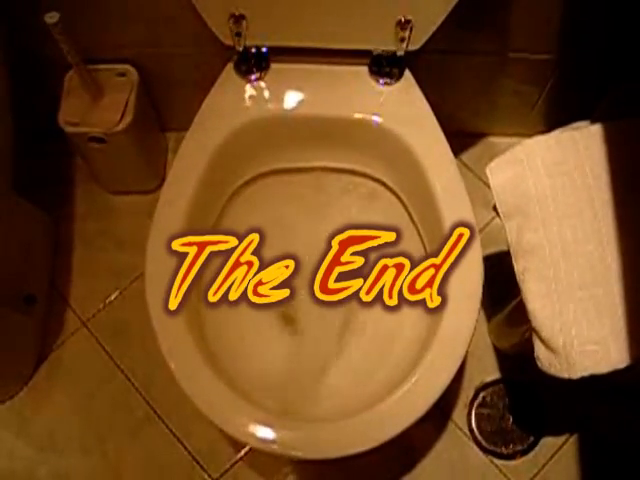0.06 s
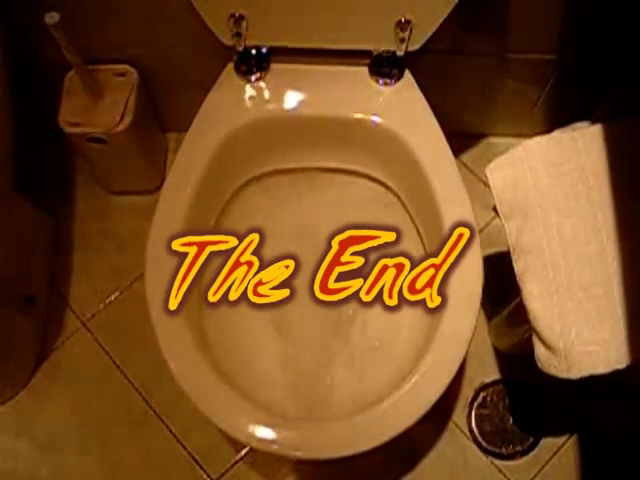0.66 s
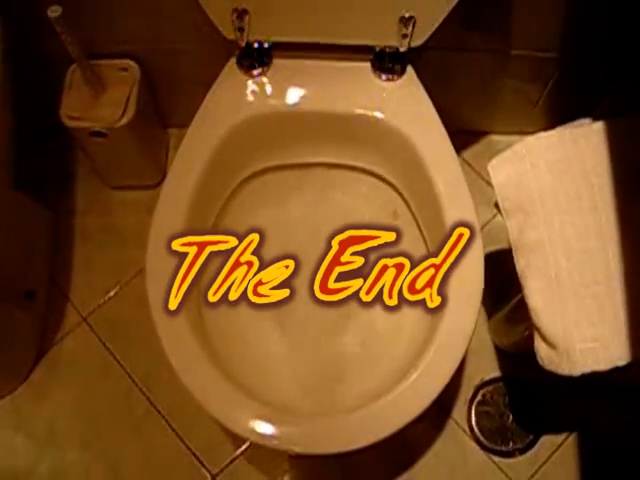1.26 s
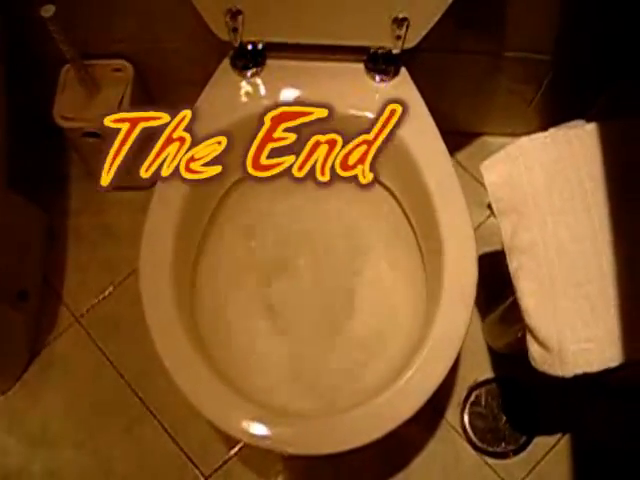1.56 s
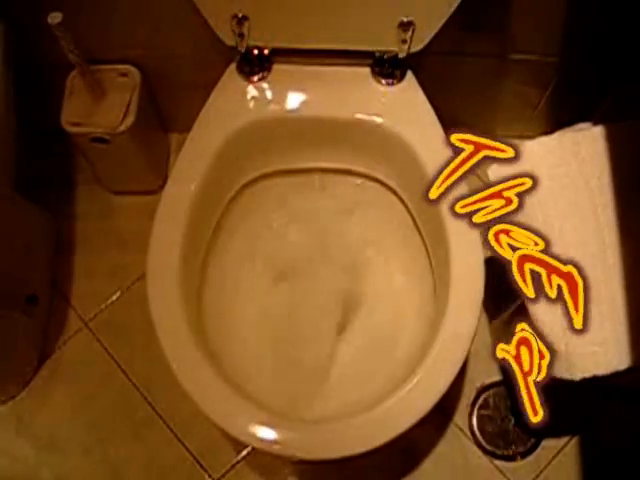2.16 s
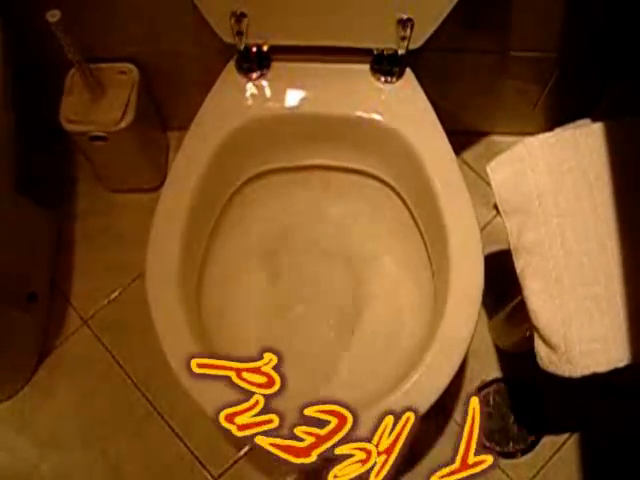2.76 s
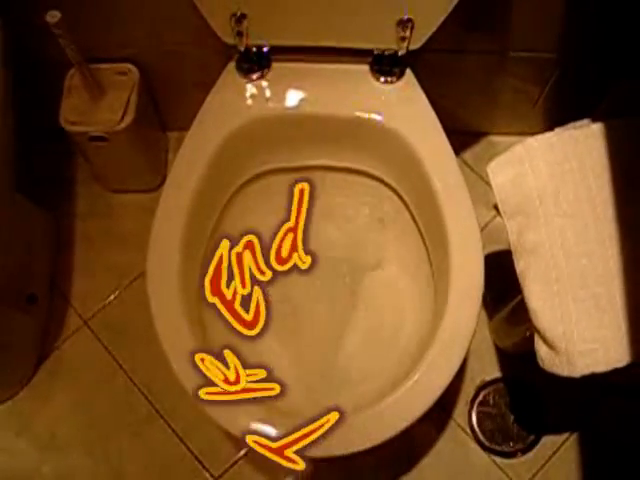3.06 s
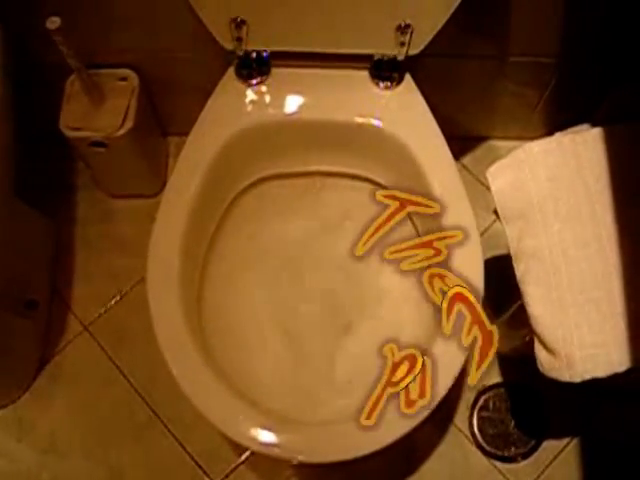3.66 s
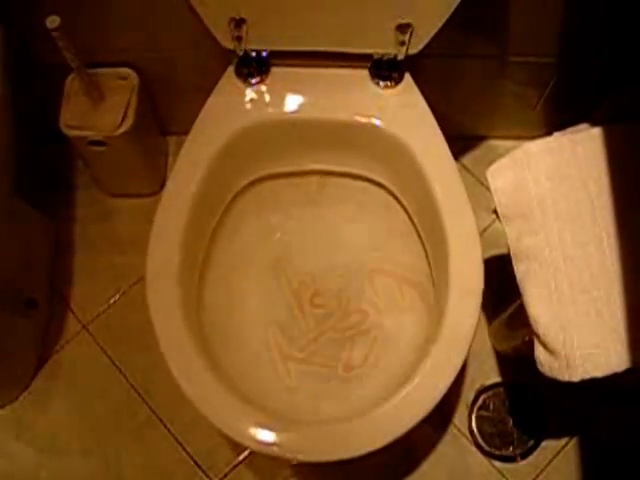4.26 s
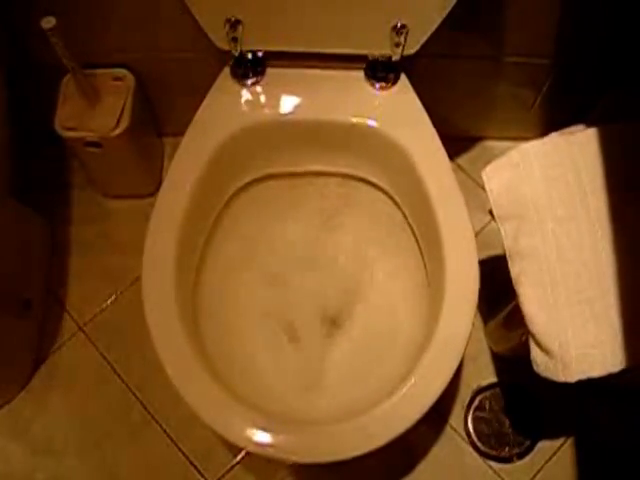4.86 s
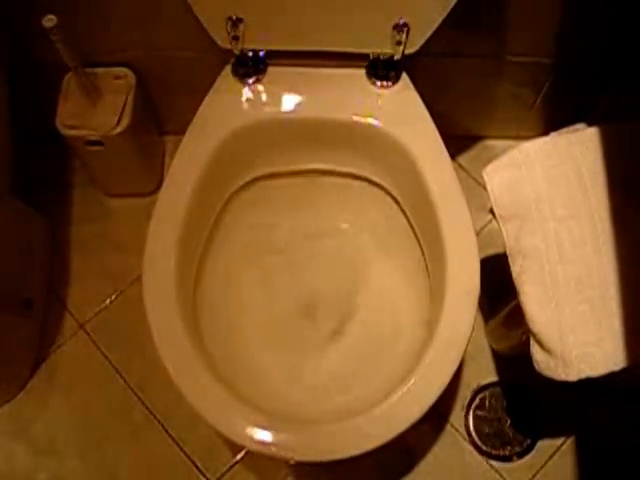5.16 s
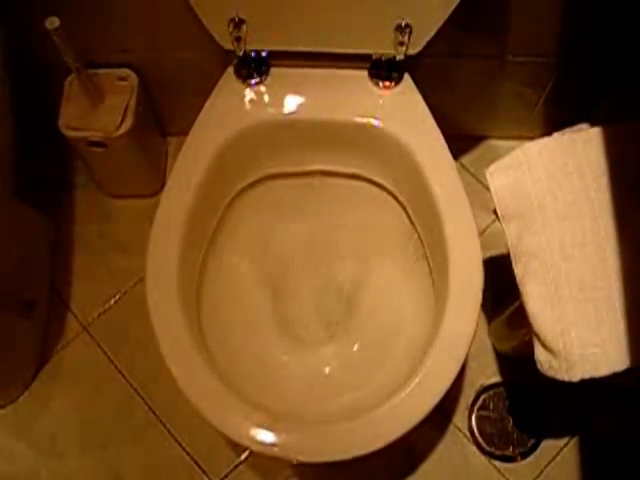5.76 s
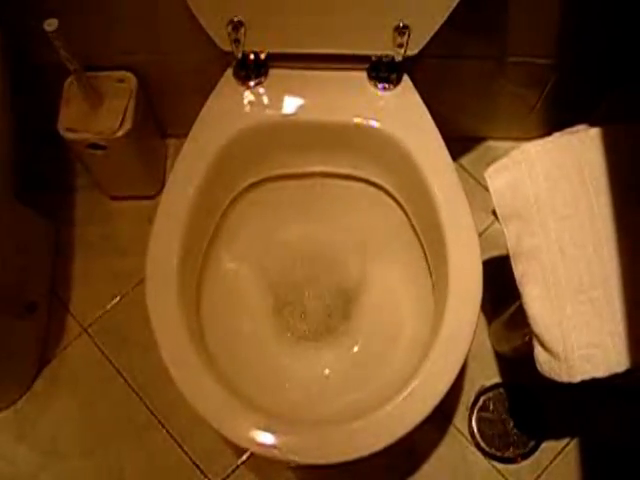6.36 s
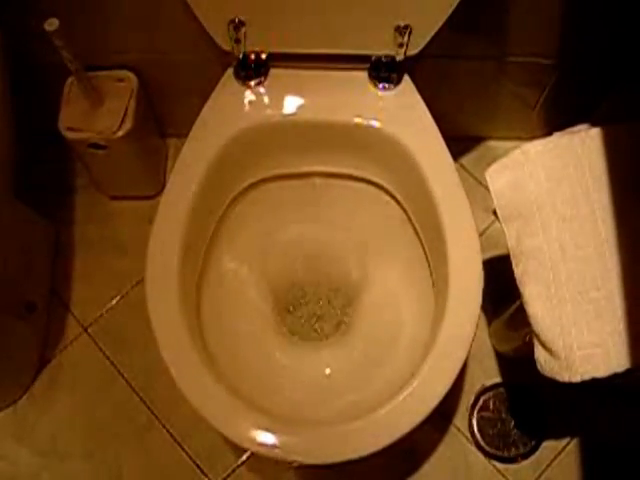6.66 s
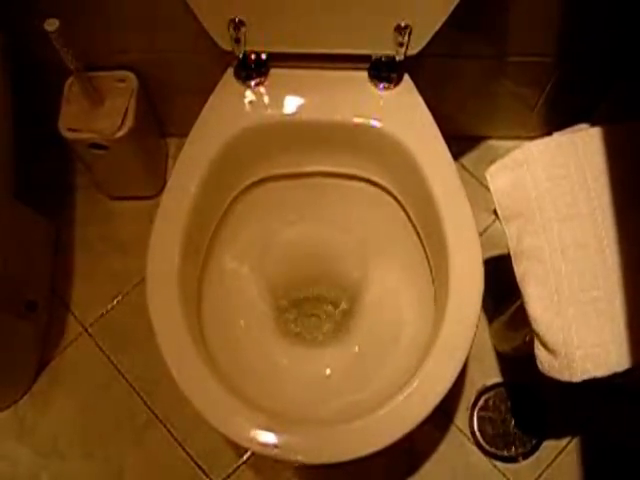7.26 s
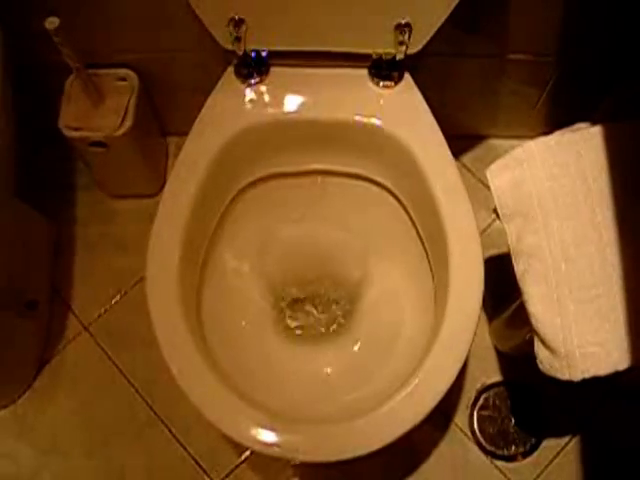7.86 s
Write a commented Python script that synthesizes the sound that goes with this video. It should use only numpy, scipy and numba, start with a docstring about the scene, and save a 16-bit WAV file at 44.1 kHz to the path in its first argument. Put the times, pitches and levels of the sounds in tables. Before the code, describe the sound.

A toilet flushes with a deep gush, churning and swirling down, then splashing and gurgling at the drain in a small tiled bathroom.

```python
"""Water plunges into a toilet bowl with a deep gush, heard from just above in a small tiled bathroom.
The flush churns in surges, calms as it swirls down, then splashes and gurgles in the emptying drain.
Air bubbles caught in the water ring like tiny bells: big ones low, small ones high.
Swarms of them mix with the spatter of drops. The hollow bowl colours the sound and the tiles echo it."""
import sys
import numpy as np
from scipy import signal
from scipy.fft import irfft
from scipy.io import wavfile
from numba import njit

SR = 44100
rng = np.random.default_rng(int(sys.argv[2]) if len(sys.argv) > 2 else 0)


def output_pcm(signal):
    """Save a mono or channel-first signal as 16-bit PCM at the path in sys.argv[1].

    Samples are clipped to [-1, 1] before scaling.
    """
    pcm = np.clip(np.atleast_2d(signal).T, -1, 1) * 32767
    wavfile.write(sys.argv[1], SR, np.round(pcm).astype(np.int16))


N = 353241
TIME = np.arange(N) / SR
SURGE_RISE_S, SURGE_FADE_S = .015, .021  # a fade time is how long a sound takes to fall to 37%
# waves that fold over in the bowl and churn air under: (start [s], length [s], churn level [dB])
WAVES = [(1.455, 0.068, -26.5), (1.765, 0.12, -30), (1.913, 0.025, -25.5), (1.99, 0.069, -29.5),
         (2.486, 0.076, -27.5), (2.662, 0.092, -24.5), (2.882, 0.052, -32), (3.026, 0.066, -27.5),
         (3.155, 0.041, -27.5), (3.293, 0.082, -28.5), (3.371, 0.076, -29), (3.533, 0.17, -27),
         (3.885, 0.075, -29), (5.841, 0.04, -27), (5.99, 0.039, -31), (6.119, 0.034, -27),
         (6.325, 0.12, -30), (6.566, 0.031, -33), (7.094, 0.038, -22.5), (7.447, 0.017, -25),
         (7.748, 0.049, -27)]


def amp(db):
    """Turns decibels into a number to multiply a sound by."""
    return 10 ** (np.asarray(db) / 20)


def evened(x):
    """Scales a signal so that its average strength (rms) is 1."""
    return x / np.sqrt(np.mean(x ** 2) + 1e-20)


def at_pitch(points, hz):
    """Looks up a value between the rows of a (pitch, value) table."""
    pitches, values = np.transpose(points)
    return np.interp(np.log(hz + 1), np.log(pitches), values)


def curves(rows):
    """Joins the rows of a (time, values...) table into one curve for each value column."""
    times, *columns = np.transpose(rows)
    return [np.interp(TIME, times, column) for column in columns]


def add(mix, start_s, sound):
    """Mixes a sound in at the given time."""
    part = mix[max(round(start_s * SR), 0):][:len(sound)]
    part += sound[:len(part)]


def band_noise(lo_hz, hi_hz):
    """Noise between two frequencies; at just a few Hz it is a slow, random wobble."""
    band = signal.butter(2, [lo_hz, hi_hz], "band", fs=SR, output="sos")
    return evened(signal.sosfilt(band, rng.standard_normal(N)))


def colour(x, db_at, size=8192):
    """Turns each frequency up or down by db_at(hz); any ringing follows the sound, never leads it."""
    hz = abs(np.fft.fftfreq(size, 1 / SR))
    log_gain = np.log(amp(np.maximum(db_at(hz), -90)))
    taps = np.fft.ifft(np.exp(np.conj(signal.hilbert(log_gain)))).real
    return signal.oaconvolve(x, taps[:size // 2])[:N]


def bowl(x):
    """The air in the hollow bowl rings on at its own pitches."""
    # pitches the bowl lifts or weakens: (pitch [Hz], width [Hz], boost [dB])
    resonances = [(296, 26, 12.5), (392.7, 33, 10), (505, 76, 9.5), (587, 70, 8.5), (750, 4, 12),
                  (1031, 110, -8), (1232, 69, 8.5), (1624, 25, 7), (1992, 17, 8), (3482, 46, 7)]
    return colour(x, lambda hz: sum(db / (1 + (2 * (hz - f) / width) ** 2) for f, width, db in resonances))


@njit
def ring(starts, hz, peaks, fades_s, glides, onset):
    """Each bubble is a dying tone whose pitch slides as it nears the surface."""
    out = np.zeros(N)
    for k in range(len(starts)):
        life = fades_s[k] * SR  # in samples; onset is a share of it
        step = 2 * np.pi * hz[k] / SR
        turn = np.exp(1j * step - 1 / life)  # spins and shrinks the tone
        bend = np.exp(1j * step * glides[k] / life)  # slides its pitch
        opening = np.exp(-1 / (onset * life))  # softens its start
        tone, closed = peaks[k] + 0j, 1.
        for i in range(starts[k], min(starts[k] + int(5 * life), N)):
            out[i] += tone.imag * (1 - closed)
            tone *= turn
            turn *= bend
            closed *= opening
    return out


def surge_power(starts_s, lengths_s, levels_db, swell_db=0):
    """Total power of surges that each rise, hold (growing by swell_db) and die away."""
    power = np.zeros(N)
    for start, length, db in zip(starts_s, lengths_s, levels_db):
        t = TIME[:int((length + .2) * SR)]
        shape = np.minimum(t / SURGE_RISE_S, 1) * np.exp(-np.maximum(t - length, 0) / SURGE_FADE_S)
        growth_db = swell_db * (np.minimum(t / length, 1) - .5)
        add(power, start, (amp(db + growth_db) * shape) ** 2)
    return power


def water_levels():
    """Levels in dB of plunge, gurgle, churn and spray: steady flow plus gushes, waves and air pockets."""
    # the steady run of water: (time [s], plunge [dB], gurgle [dB], churn [dB], spray [dB])
    flow = [(0.0, -21.5, -36.5, -35.5, -30.5), (0.45, -46.5, -49, -30, -32),
            (0.85, -54.5, -46.5, -36.5, -33.5), (1.65, -54.5, -45.5, -32, -36), (2.3, -56, -46.5, -37, -38),
            (2.8, -49.5, -44, -34.5, -35.5), (3.4, -43.5, -44, -33.5, -41), (4.05, -39, -45, -34.5, -40.5),
            (4.28, -51, -45.5, -44, -39.5), (4.7, -50.5, -49.5, -42.5, -42.5), (5.55, -50.5, -45, -39, -40),
            (5.82, -48, -39.5, -39, -36), (6.0, -45, -43.5, -36, -42), (6.32, -37.5, -27.5, -28, -29.5),
            (6.95, -40, -30, -28, -29), (7.35, -30, -29.5, -27, -28), (8.0, -49, -28, -28.5, -31.5)]
    # gushes that dive deep and throw up spray: (start [s], length [s], plunge [dB], spray [dB])
    gushes = [(0.0, 0.085, -30, -28.5), (0.249, 0.089, -25, -28.5), (0.332, 0.034, -23, -23.5),
              (1.063, 0.078, -35.5, -32.5), (1.475, 0.028, -37, -31), (1.765, 0.17, -36, -32.5),
              (2.098, 0.055, -33.5, -35.5), (3.362, 0.091, -36, -46.5), (4.442, 0.06, -43, -34.5),
              (6.242, 0.1, -42, -31), (7.158, 0.043, -25, -29), (7.358, 0.026, -29.5, -33.5),
              (7.442, 0.016, -30.5, -24), (7.547, 0.084, -27, -46.5), (7.82, 0.063, -28.5, -25),
              (7.906, 0.11, -29, -30.5)]
    # moments when the steady run lets up: (middle [s], length [s], dip [dB])
    lulls = [(1.97, 0.032, -3.5), (3.513, 0.036, -2.5), (6.225, 0.036, -4.5), (6.664, 0.041, -9.5),
             (7.325, 0.049, -6.5), (7.489, 0.04, -6), (7.662, 0.027, -4)]
    # large air pockets that glug at the drain: (start [s], length [s], gurgle [dB])
    air_pockets = [(4.401, 0.029, -41.5), (4.834, 0.072, -40), (5.276, 0.079, -37.5), (5.919, 0.053, -35.5),
                   (6.089, 0.025, -27.5), (6.772, 0.092, -29.5), (7, 0.2, -26.5), (7.699, 0.13, -28.5)]
    lull_db = sum(db * np.exp(-(2 * (TIME - middle) / length) ** 2) for middle, length, db in lulls)
    plunge, gurgle, churn, spray = amp(np.array(curves(flow)) + lull_db) ** 2
    starts_s, lengths_s, deep_db, thrown_db = np.transpose(gushes)
    deep = surge_power(starts_s, lengths_s, deep_db)
    thrown = surge_power(starts_s, lengths_s, thrown_db)
    waves = surge_power(*np.transpose(WAVES), swell_db=5.5)
    glugs = surge_power(*np.transpose(air_pockets))
    # waves and gushes also stir the other bubble sizes, more weakly
    return 10 * np.log10([
        plunge + deep + amp(-14.5) ** 2 * waves,
        gurgle + glugs + amp(-17.5) ** 2 * waves + amp(-4.5) ** 2 * deep,
        churn + waves + amp(-1.5) ** 2 * thrown,
        spray + thrown + amp(-14) ** 2 * waves])


def swarm(sizes, level_db, max_per_s, cycles, spread_db, glide, spatter_db, slosh_db, tilt_db,
          thinning=.45, count=24000):
    """Many bubbles and a spatter of tiny impacts ring in the bowl; calm water makes fewer of both."""
    when, pitch, strength, damping, slide, chance = rng.random((count, 6)).T
    busy = amp(thinning * (level_db - level_db.max()))
    starts = (when * N).astype(np.int64)
    born = chance < max_per_s * busy[starts] * TIME[-1] / count
    lo, hi = sizes[0][0], sizes[-1][0]
    hz = lo * (hi / lo) ** pitch
    fades_s = cycles / hz * 2 ** (2 * damping - 1)
    # most bubbles are faint, a few strong; small ones die sooner and start louder
    peaks = amp(at_pitch(sizes, hz) + spread_db * np.minimum(-np.log(1 - strength), 4)) * hz / hi
    # a tilt (dB per octave) above zero favours high bubbles, below zero low ones
    peaks *= amp(tilt_db[starts] * np.log2(hz / np.sqrt(lo * hi)))
    glides = glide * (slide - .3)
    bubbles = ring(starts[born], hz[born], peaks[born], fades_s[born], glides[born], onset=.14)
    impacts = rng.standard_normal(N) * amp(3.07 * np.minimum(rng.exponential(1, N), 5))
    impacts *= rng.random(N) < 5000 * busy / SR
    # the spatter falls away by 40 dB per octave outside the bubbles' range
    spatter = colour(
        impacts, lambda f: at_pitch(sizes, f) - 40 * abs(np.log2((f + 1) / np.clip(f + 1, lo, hi))))
    water = bowl((evened(bubbles) + amp(spatter_db) * evened(spatter)) * amp(slosh_db))
    # flatten the slow swings in loudness, so that level_db shapes them
    power = signal.oaconvolve(water ** 2, signal.windows.hann(SR // 11), "same")
    return amp(level_db) * evened(water / np.sqrt(abs(power) + 1e-12))


def rush(plunge_db, gurgle_db, churn_db, spray_db):
    """Four swarms of bubbles, from deep plunge to fine spray, all shaken by the same sloshing."""
    # how strong each swarm's bubbles are, from big to small: (pitch [Hz], level [dB])
    plunge_sizes = [(60, -30), (105, -9.5), (175, -16), (240, -1.5), (310, 7), (450, -2.5), (620, -8)]
    gurgle_sizes = [(430, -13), (570, -6.5), (800, 0.5), (1050, 9), (1250, -13)]
    churn_sizes = [(1080, -11.5), (1220, 2.5), (1750, 4.5), (2250, 1), (2900, -7.5)]
    spray_sizes = [(2100, -5), (2750, 0), (4500, -1), (6000, -2.5), (8000, -10.5)]
    # the plunge booms deepest while the bowl is full: (time [s], tilt [dB per octave])
    plunge_tilts = [(0.3, -6.5), (2.0, -3), (4.5, -1.7), (7.0, -2)]
    # bubbles ring deep in the full bowl and higher as it empties: (time [s], tilt [dB per octave])
    gurgle_tilts = [(0, -5.5), (.7, -4), (4.9, -9.5), (6.2, 16.5)]
    plunge_tilt, = curves(plunge_tilts)
    gurgle_tilt, = curves(gurgle_tilts)
    churn_tilt = .47 * gurgle_tilt + wave_tilt()
    spray_tilt = -.42 * (spray_db - spray_db.mean())  # a hard splash throws larger, lower drops
    slosh, lapping_db = band_noise(9.9, 34), 1.03 * band_noise(6, 14)
    plunge = swarm(plunge_sizes, plunge_db - .6, max_per_s=920, cycles=3.74, spread_db=3.5,
                   glide=.0073, spatter_db=-3, slosh_db=2.1 * slosh, tilt_db=plunge_tilt)
    gurgle = swarm(gurgle_sizes, gurgle_db + lapping_db - .32, max_per_s=380, cycles=9.7, spread_db=.5,
                   glide=.071, spatter_db=-10, slosh_db=.59 * slosh, tilt_db=gurgle_tilt)
    churn = swarm(churn_sizes, churn_db + lapping_db - 1.78, max_per_s=2400, cycles=18, spread_db=4.5,
                  glide=.05, spatter_db=-8, slosh_db=1.6 * slosh, tilt_db=churn_tilt, thinning=.85)
    spray = swarm(spray_sizes, spray_db + lapping_db - 1.5, max_per_s=1900, cycles=14, spread_db=4.5,
                  glide=.027, spatter_db=-2, slosh_db=slosh, tilt_db=spray_tilt)
    return plunge + gurgle + churn + spray


def puffs(rows, hz=365, width_s=.0019, bowl_share=.44):
    """Short pushes of air, given as (time [s], level [dB]); part of each sets the bowl ringing."""
    out, t = np.zeros(N), TIME[:SR // 100] - 2 * width_s
    for middle, db in rows:
        add(out, middle + t[0], amp(db) * np.cos(2 * np.pi * hz * t) * np.exp(-(t / width_s) ** 2))
    return (1 - bowl_share) * out + bowl_share * bowl(out)


def flutter(ends_db=-5, jitter_s=.0002):
    """Trapped air escapes in quick runs of low puffs, strongest in the middle."""
    # runs of puffs: (start [s], length [s], puff rate [Hz], level [dB])
    runs = [(0.058, 0.034, 86, -21), (0.267, 0.044, 95.4, -17), (1.776, 0.145, 79.9, -28),
            (2.0716, 0.04, 97, -17)]
    rows = []
    for start, length, rate_hz, db in runs:
        for t in np.arange(0, length, 1 / rate_hz):
            when = start + t + jitter_s * rng.standard_normal()
            rows.append((when, db + ends_db * (2 * t / length - 1) ** 2))
    return puffs(rows)


def bubble_cluster(hz, width, size):
    """Tiny bubbles ringing together: noise with pitches spread around hz by the factor width."""
    f = np.fft.rfftfreq(size, 1 / SR) + 1
    strength = np.exp(-.5 * (np.log(f / hz) / np.log(width)) ** 2)
    phases = np.exp(2j * np.pi * rng.random(len(f)))
    return evened(irfft(strength * phases, size))


def slaps(rise_s=.0004, fade_s=.0063, width=1.73, gain_db=-1):
    """A sheet of water lands: a short wet splash, and a thud as it pushes the air in the bowl."""
    # water hitting water or porcelain: (time [s], splash level [dB], pitch [Hz], thud level [dB])
    landings = [(0.137,-20.5,1490,-12.5), (0.228,-28,2500,-16.5), (0.335,-27,2180,-15),
                (0.41,-20.5,1590,-38), (0.498,-19.5,1990,-32), (1.067,-18.5,3000,-34), (1.112,-21,3400,-30),
                (1.127,-22,3600,-34), (1.767,-13,1900,-33), (1.822,-20,3180,-24.5), (1.85,-16,1900,-31),
                (1.869,-20,2230,-30), (3.175,-21,1720,-30.5), (3.363,-26,1500,-29), (4.07,-29.5,1700,-35),
                (6.245,-18,2400,-37), (6.287,-18.5,1500,-33), (6.595,-15.5,1500,-30), (6.678,-16,2850,-19),
                (6.716,-12.5,2550,-41), (6.848,-26,1300,-29.5), (7.03,-15,1510,-18.5),
                (7.107,-14.5,1890,-20), (7.127,-10.5,2300,-24), (7.443,-15,1900,-17), (7.459,-22,2200,-18),
                (7.604,-23,2010,-24), (7.625,-11,2000,-20), (7.85,-22.5,2770,-27)]
    splashes, t = np.zeros(N), TIME[:SR // 20]
    shape = (1 - np.exp(-t / rise_s)) * np.exp(-t / fade_s)
    for start, db, hz, _ in landings:
        add(splashes, start, amp(db + gain_db) * bubble_cluster(hz, width, len(t)) * shape)
    thuds = puffs([(start + rise_s, thud_db) for start, _, _, thud_db in landings])
    return bowl(splashes) + thuds


def loud_bubbles(gain_db=6.5, glide=-.0058, onset=.48, shed_count=8, shed_within_s=.028, shed_fade_s=.004):
    """Single bubbles stand out as plops and pings; each sheds fainter ones near its own pitch."""
    # the bubbles that stand out: (time [s], pitch [Hz], level [dB], fade time [s])
    plops = [(0.182,292,-18,0.04), (0.287,288,-19.5,0.039), (0.594,1214,-17,0.012), (0.621,1233,-34,0.014),
             (0.925,1217,-27,0.016), (0.955,1267,-19,0.013), (1.088,3430,-19,0.019),
             (1.108,3140,-21.5,0.018), (1.374,1416,-18.5,0.01), (1.706,1446,-19,0.0071),
             (1.921,2140,-11.5,0.0037), (2.953,1375,-21.5,0.01), (3.717,1320,-17.5,0.0039),
             (3.76,1253,-22.5,0.029), (3.835,604,-31.5,0.019), (3.917,1237,-25,0.0053),
             (4.403,585,-27.5,0.016), (4.529,1250,-20.5,0.0096), (4.557,1506,-28,0.0073),
             (4.59,1860,-26.5,0.0071), (4.745,1282,-27.5,0.0074), (5.061,1292,-20.5,0.0063),
             (5.197,1680,-23,0.0086), (5.294,732,-23,0.01), (5.295,2210,-20,0.003), (5.355,577,-32.5,0.031),
             (5.673,1080,-18,0.0053), (5.777,1065,-26.5,0.0064), (5.814,405,-27,0.0052),
             (5.846,1260,-19.5,0.0069), (6.1,756,-25.5,0.019), (6.1,1024,-20.5,0.0065),
             (6.676,1025,-14.5,0.004), (6.803,1083,-22,0.008), (6.847,1034,-18,0.0035),
             (7.069,354,-13.5,0.01), (7.09,1030,-16,0.0089), (7.143,767,-11,0.0058), (7.151,984,-10,0.0048),
             (7.175,311,-19.5,0.022), (7.197,1040,-16.5,0.006), (7.257,887,-9.5,0.0027),
             (7.281,1057,-5,0.0053), (7.517,1032,-14.5,0.0065), (7.673,966,-11,0.0034),
             (7.724,990,-10.5,0.0048), (7.835,744,-14.5,0.0079), (7.848,296,-17.5,0.036)]
    times, hz, db, fades_s = np.transpose(plops)
    slide, delay, detune = rng.random((len(plops), 3, shed_count)).transpose(1, 2, 0)
    out = ring((times * SR).astype(np.int64), hz, amp(db + gain_db), fades_s, glide * slide[0], onset)
    shed_fades_s, no_glide = np.full(len(plops), shed_fade_s), np.zeros(len(plops))
    for later, octaves in zip(delay, .24 * (2 * detune - .7)):
        starts = ((times + shed_within_s * later) * SR).astype(np.int64)
        peaks = amp(np.minimum(db, -21) + gain_db - 8 * (1 + later))
        out += ring(starts, hz * 2 ** octaves, peaks, shed_fades_s, no_glide, onset)
    return out


def drops(spray_db, gain_db=1.5, strays_per_s=16, rise_s=.000069, fade_s=.0062, tick_s=.0014, width=1.16):
    """A drop bursts with a sharp tick into like-sized tiny bubbles; stray drops fall with the spray."""
    # the drops that stand out: (time [s], level [dB], pitch [Hz])
    loud_drops = [(1.084, -18.5, 4130), (1.136, -20, 4300), (1.165, -21.5, 4060), (2.1, -23.5, 6000),
                  (2.13, -25, 2260), (3.442, -28, 3460), (5.3316, -22.5, 5640), (5.595, -29, 4860),
                  (5.674, -25, 3400), (5.736, -26.5, 4800), (5.747, -23.5, 4750), (5.878, -29, 5700),
                  (6.0716, -27, 5100), (6.09, -23, 4500), (6.351, -21.5, 5200), (6.361, -22, 4850),
                  (6.452, -18, 3630), (6.722, -21, 3120), (7.414, -17.5, 7260), (7.849, -15, 4550)]
    loud = [(start, db + gain_db, hz) for start, db, hz in loud_drops]
    when, pitch, strength = rng.random((int(strays_per_s * TIME[-1]), 3)).T
    strays_db = spray_db[(when * N).astype(int)] - 3.5 + 3 * np.minimum(-np.log(1 - strength), 3)
    strays = list(zip(when * TIME[-1], strays_db, 2600 + 4200 * pitch))
    out, t = np.zeros(N), TIME[:SR // 40]
    shape = (1 - np.exp(-t / rise_s)) * (np.exp(-t / fade_s) + .66 * np.exp(-t / tick_s))
    for start, db, hz in loud + strays:
        add(out, start, amp(db) * bubble_cluster(hz, width, len(t)) * shape)
    return out


def wave_tilt(first_db_per_octave=-11, last_db_per_octave=11.5):
    """Each wave traps large bubbles first and then breaks them finer, so its churn rises in pitch."""
    tilt_db = np.zeros(N)
    for start, length, _ in WAVES:
        samples = int((length + SURGE_FADE_S) * SR)
        add(tilt_db, start, np.linspace(first_db_per_octave, last_db_per_octave, samples))
    return tilt_db


def echoes(early_db=-11, tail_db=-12, early_fade_s=.031):
    """The echo of one click: quick bounces off porcelain and tiles, then a short blurred tail."""
    # how long the tiled room rings: (pitch [Hz], time to fall by 60 dB [s])
    ring_times = [(150, 0.046), (1000, 0.1), (7000, 0.063)]
    t = TIME[:SR // 2]
    bounces = rng.choice([-1., 1.], len(t)) * (rng.random(len(t)) < 3000 / SR) * (t > .008)
    hz, age, spectrum = signal.stft(bounces, SR, nperseg=256)
    fading = amp(-60 * age / at_pitch(ring_times, hz)[:, None])
    tail = signal.istft(spectrum * fading, SR, nperseg=256)[1][:len(t)]
    early = rng.standard_normal(len(t)) * np.exp(-t / early_fade_s) * (t > .002)
    return amp(tail_db) * tail / np.linalg.norm(tail) + amp(early_db) * early / np.linalg.norm(early)


def room(x, spots=3):
    """The splashing roams around the bowl, and each spot has its own echoes."""
    shares = np.array([band_noise(1, 5.12) for _ in range(spots)])
    shares /= np.linalg.norm(shares, axis=0)
    return x + sum(signal.oaconvolve(x * share, echoes())[:N] for share in shares)


def scene():
    """The flush in the room, over a faint low rumble."""
    plunge_db, gurgle_db, churn_db, spray_db = water_levels()
    water = rush(plunge_db, gurgle_db, churn_db, spray_db)
    water += loud_bubbles() + drops(spray_db) + slaps() + flutter()
    rumble = amp(-60.5) * band_noise(69, 190)
    return (room(water) + rumble)[None]


def record(dry):
    """Cuts away the highest treble."""
    low_pass = signal.firwin(401, cutoff=7680, window=("kaiser", 8), fs=SR)
    return signal.oaconvolve(dry, low_pass[None], "same")


dry = scene()
out = record(dry)
output_pcm(out)
```